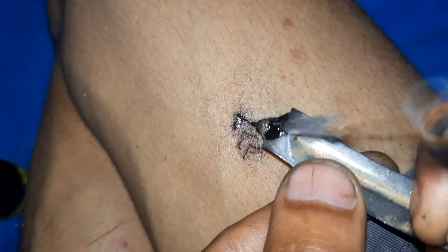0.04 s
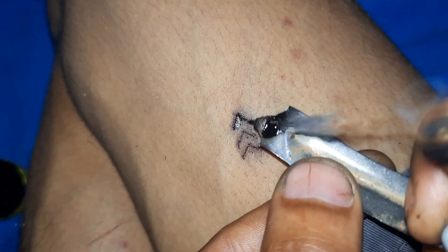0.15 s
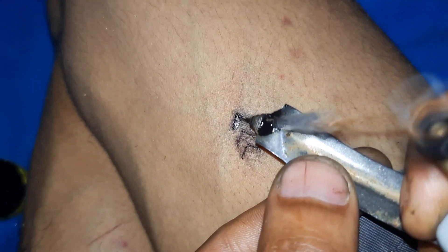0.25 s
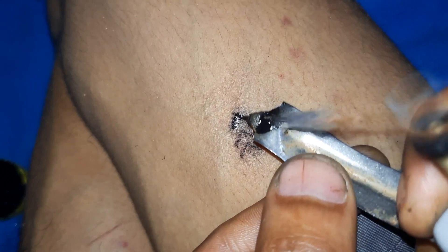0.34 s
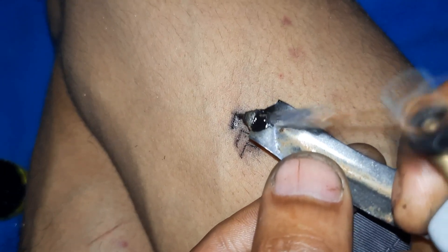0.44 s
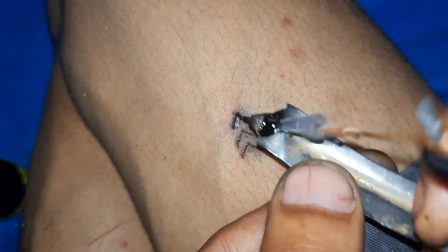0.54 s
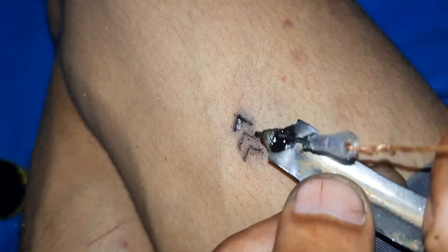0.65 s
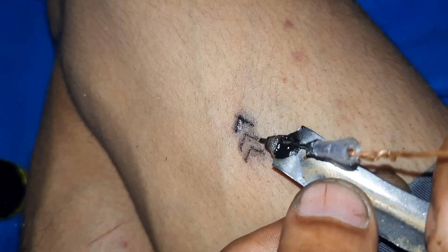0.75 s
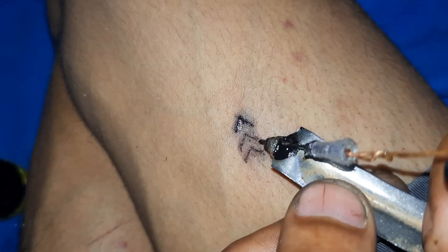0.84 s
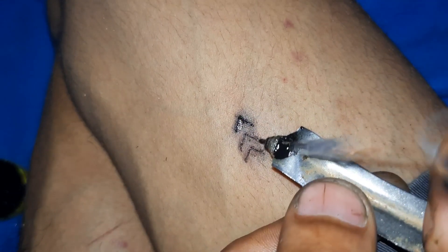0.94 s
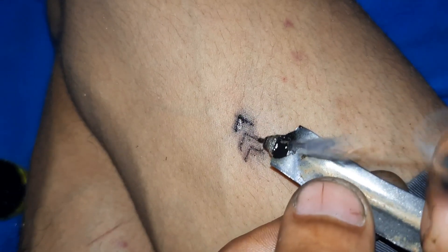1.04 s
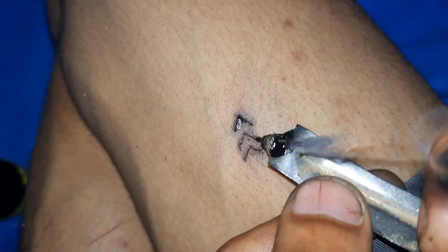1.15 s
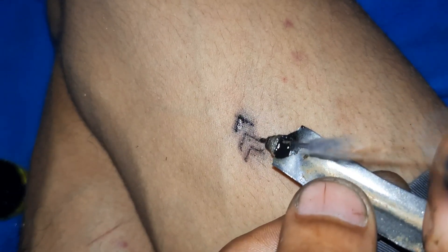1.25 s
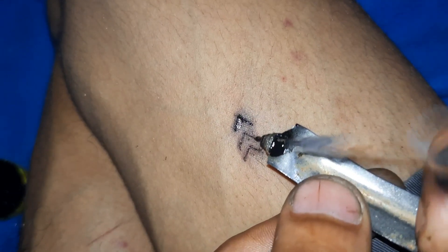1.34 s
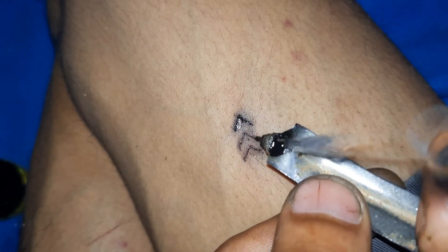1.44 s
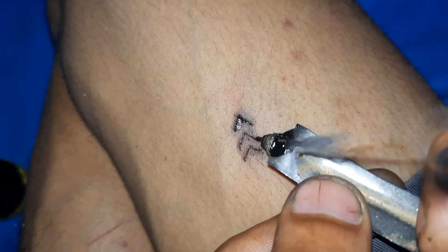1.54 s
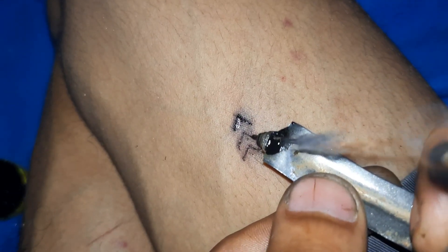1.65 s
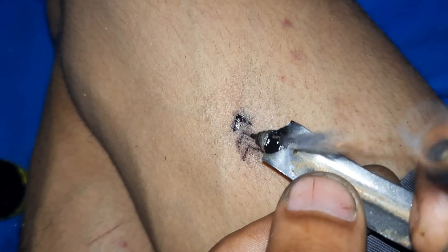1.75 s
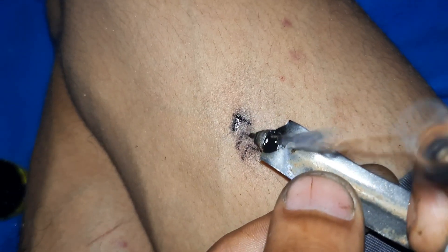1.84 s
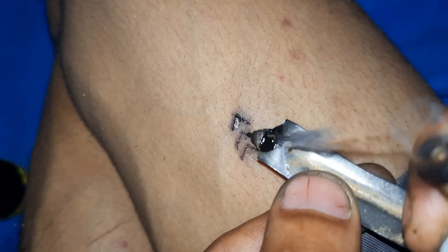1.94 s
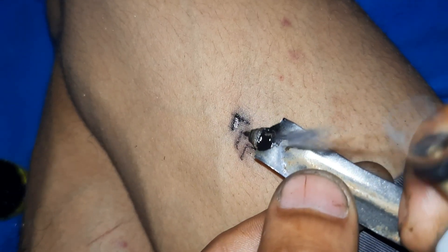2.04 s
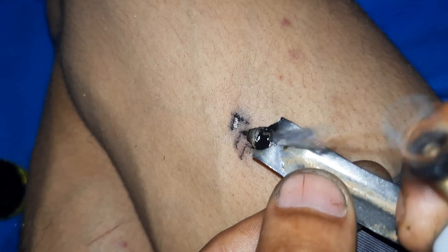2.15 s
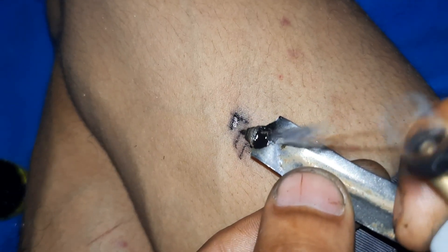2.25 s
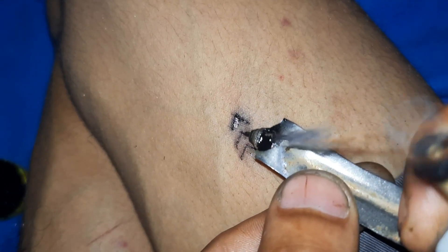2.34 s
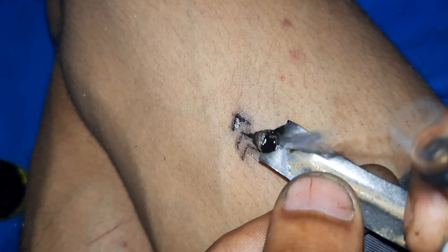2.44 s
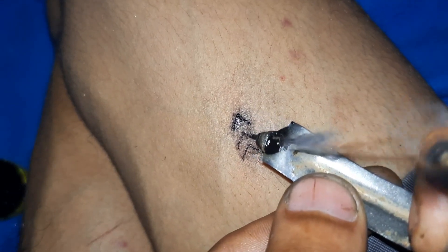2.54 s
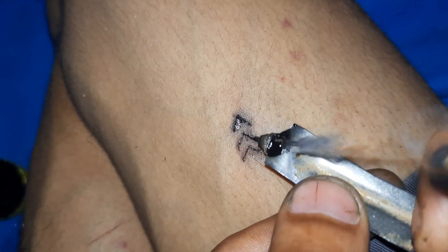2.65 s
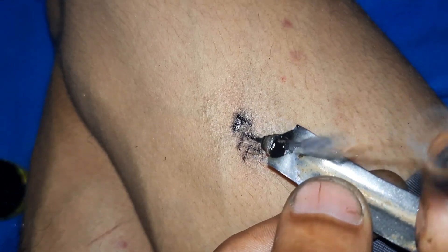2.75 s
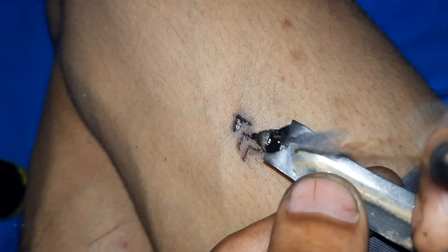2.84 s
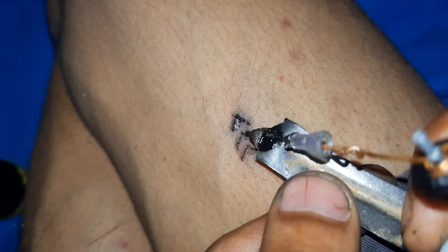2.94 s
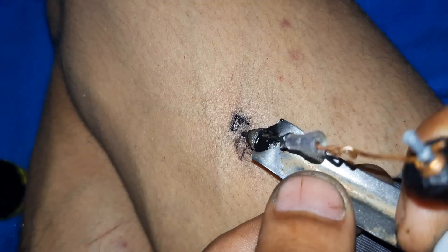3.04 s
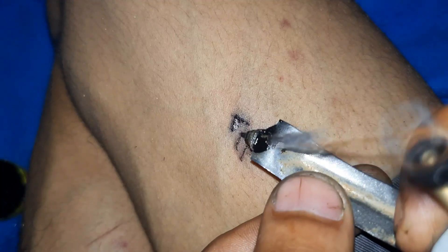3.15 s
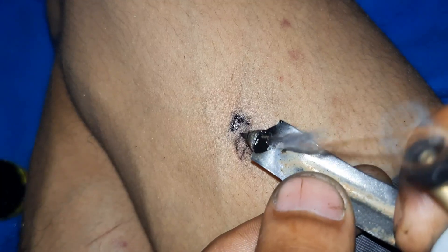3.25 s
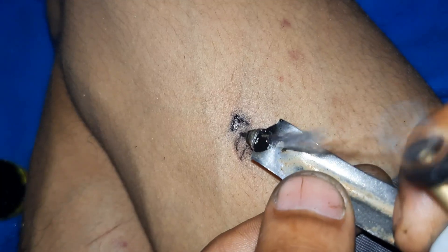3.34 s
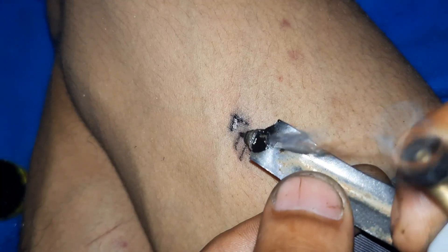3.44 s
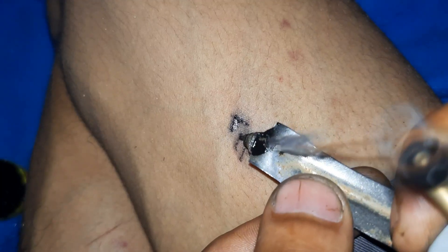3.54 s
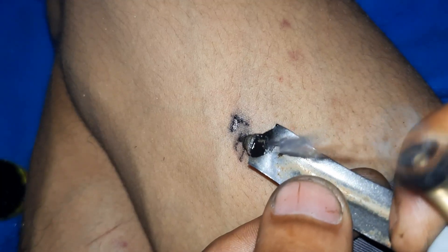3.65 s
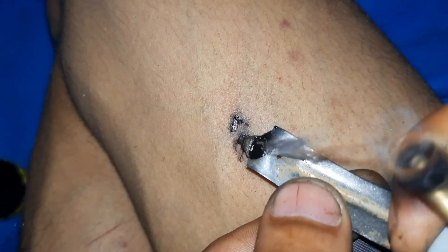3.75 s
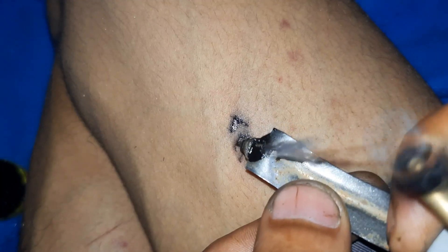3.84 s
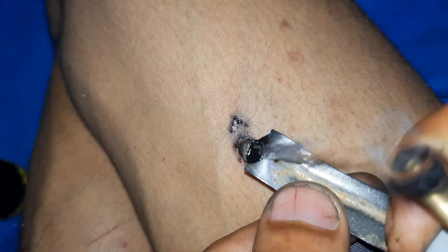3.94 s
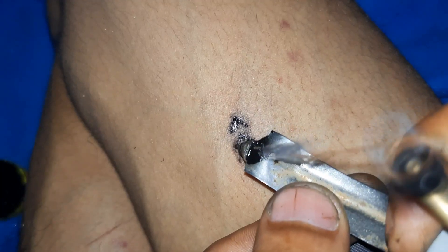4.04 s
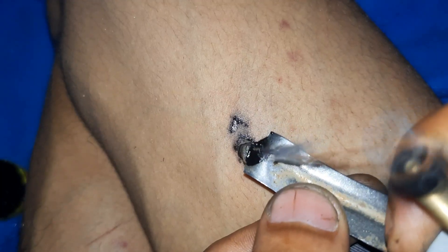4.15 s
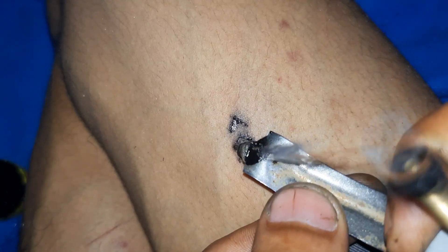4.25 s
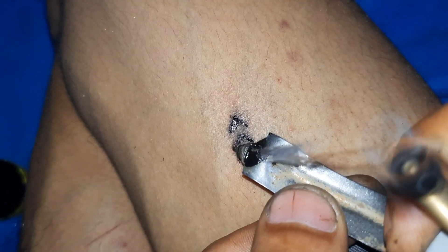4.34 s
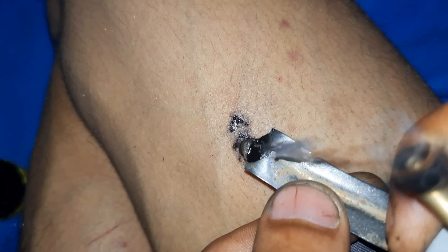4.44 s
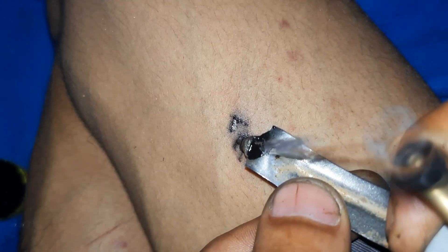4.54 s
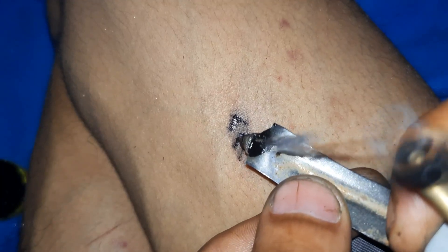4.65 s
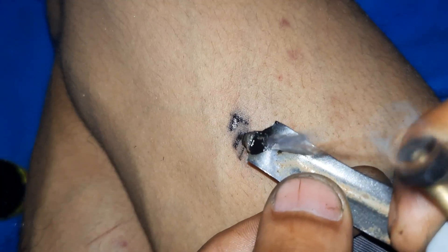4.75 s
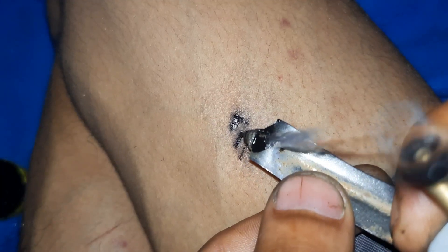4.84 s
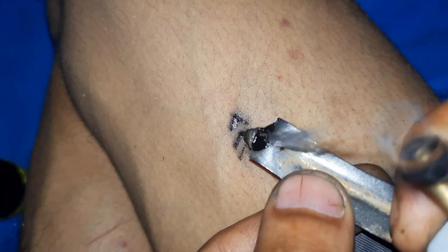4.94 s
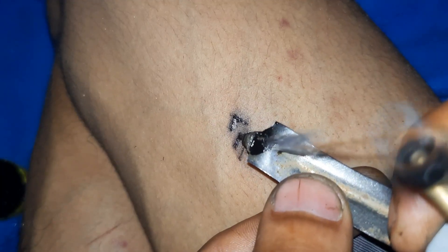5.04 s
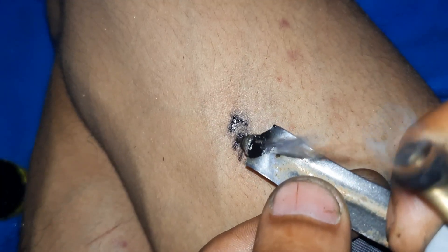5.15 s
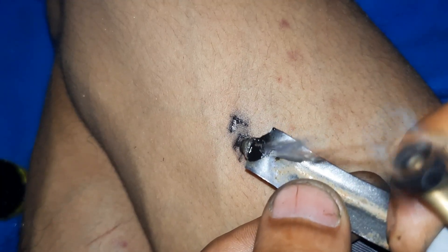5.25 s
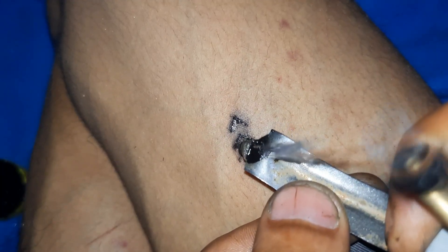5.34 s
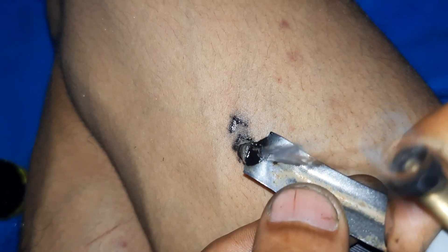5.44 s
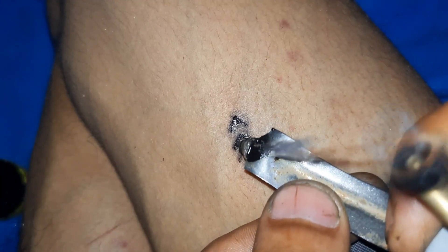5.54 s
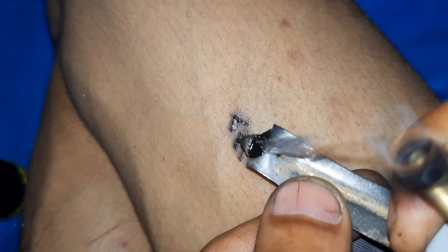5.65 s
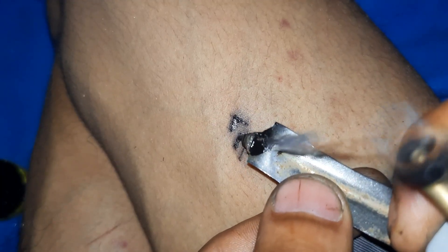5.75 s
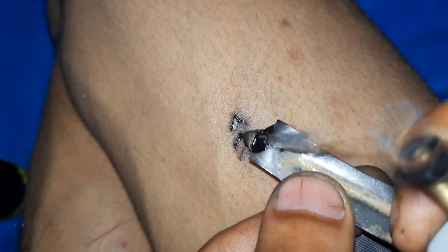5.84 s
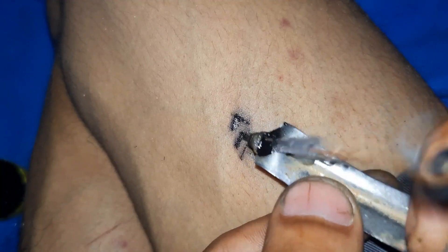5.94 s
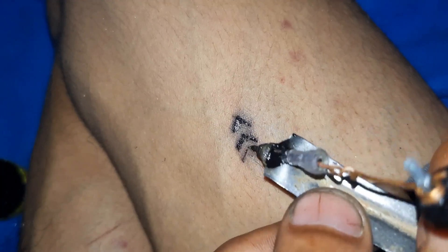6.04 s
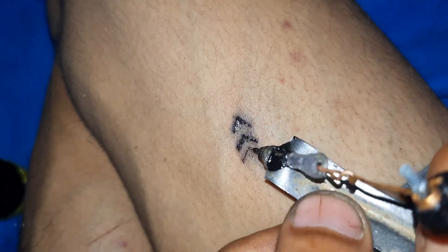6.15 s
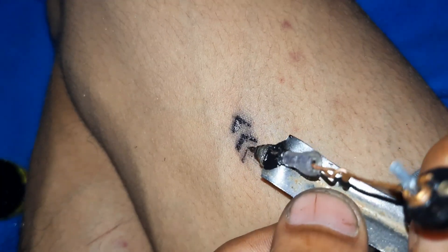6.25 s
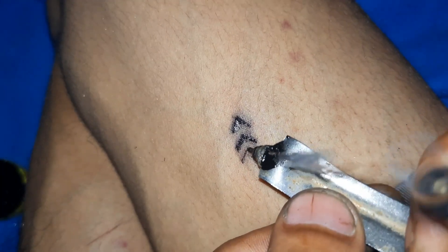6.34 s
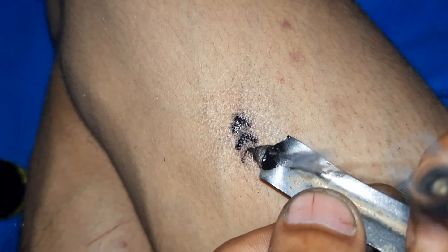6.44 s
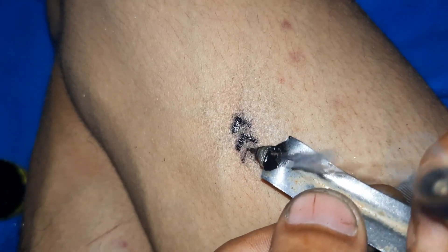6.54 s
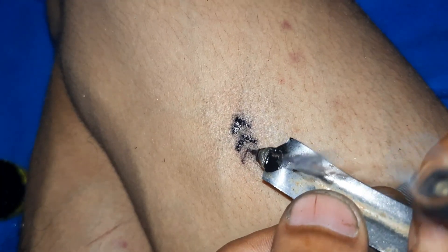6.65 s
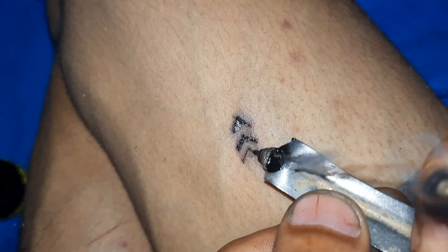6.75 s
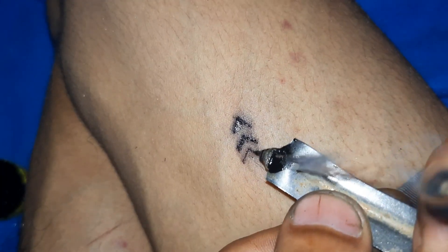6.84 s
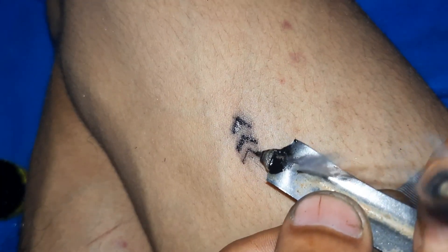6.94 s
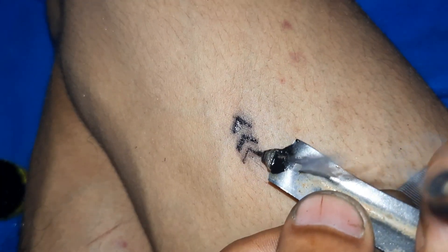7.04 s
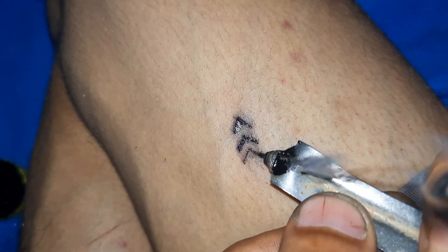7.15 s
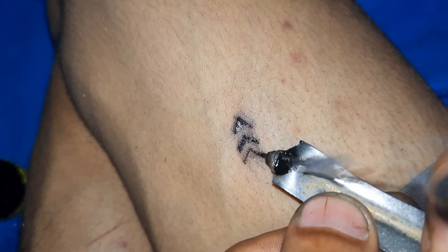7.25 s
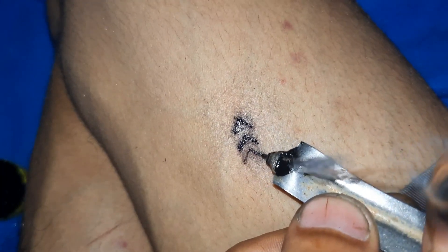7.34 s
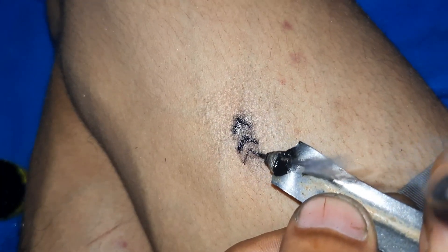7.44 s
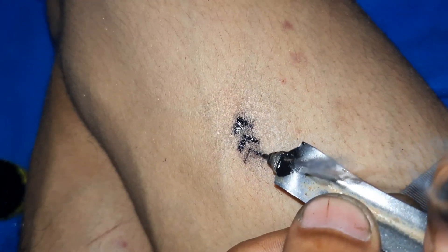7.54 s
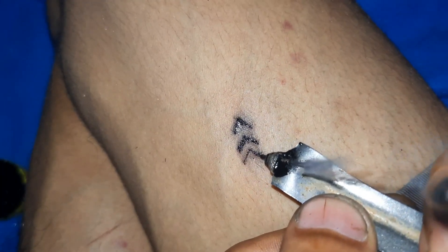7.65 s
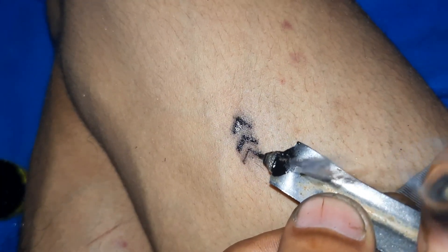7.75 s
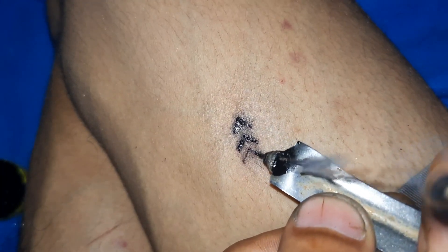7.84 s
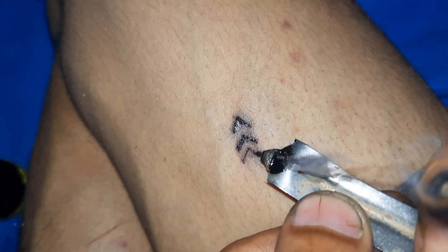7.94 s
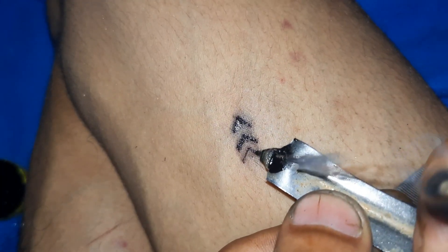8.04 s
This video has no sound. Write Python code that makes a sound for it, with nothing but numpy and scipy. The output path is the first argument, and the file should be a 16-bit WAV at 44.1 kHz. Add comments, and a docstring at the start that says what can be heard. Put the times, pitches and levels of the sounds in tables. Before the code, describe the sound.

Close, rasping buzz of a small tattoo machine working on skin in four runs, split by short pauses.

```python
"""In a small quiet room, a homemade tattoo machine runs four times, close by.
A little motor cranks a needle in a metal guide: every turn it strikes, rebounds and rattles,
making a bright clatter, a wiry rasp and a low buzz, while the skin flutters under it.
High chirps and a few sharp ticks are heard too. Between runs the motor coasts to rest, then spins up.
Faint air and hum lie under it all, and two soft bumps fall in the last pause."""
import sys
import numpy as np
from scipy import signal
from scipy.fft import rfft, irfft
from scipy.io import wavfile
from scipy.ndimage import uniform_filter1d

SR = 44100
rng = np.random.default_rng(int(sys.argv[2]) if len(sys.argv) > 2 else 0)


def wav_out(sig):
    """Save sig, one row per channel (or a flat mono array), as 16-bit PCM at SR to the path in sys.argv[1]."""
    wavfile.write(sys.argv[1], SR, np.round(np.clip(np.atleast_2d(sig).T, -1, 1) * 32767).astype(np.int16))


N = 357651
T = np.arange(N) / SR
SPLIT_HZ = 8000  # the clatter lies above this pitch, the rasp below

# The four runs. Each row: switch-on, switch-off, spin-up time constant and coasting time in seconds,
# speed in Hz, drift in Hz per second, speed lost to drag at the start in Hz.
MOTOR_RUNS = [(-.3, .55, .02, .13, 149, -6, 0), (.96, 2.905, .013, .116, 142.5, .55, 13),
              (3.155, 5.983, .023, .127, 143.4, .55, 8), (6.385, 8.3, .011, .12, 144.5, .42, 2.2)]
# The character of each run. Each row: stroke strength in dB, bounce boost in dB,
# chirp pitch in Hz, tip pitch in Hz, skin rubbing in dB.
RUN_CHARACTER = [(-29, 1.8, 8300, 14200, -68), (-29.5, 1.5, 8330, 14200, -65), (-29.5, 3, 8180, 14400, -65),
                 (-30.5, 2.5, 8320, 14750, -62.5)]
# The strike and the rebound. Each row: place in the turn from 0 to 1, relative level in dB,
# timing scatter in milliseconds, level scatter in dB.
NEEDLE_BLOWS = [(0, 2, 0.012, 1.7), (0.12, -12.5, 0.033, 5.5)]
# The rattle that follows them. Each row: the same four columns.
NEEDLE_BOUNCES = [(.21, 6.5, 0.079, 1.8), (.33, 3.5, .2, 1.8), (0.451, 6, .14, 2.5), (0.608, -4.5, .2, 2),
                  (0.771, -6.5, .3, 2)]
# Thin rings of the metal guide. Each row: pitch in Hz, width in Hz, gain in dB.
GUIDE_RINGS = [(10910, 410, 1.5), (15200, 520, -15)]
# How fast the echo dies. Each row: frequency in Hz, seconds to fall by 60 dB.
ROOM_DECAY = [(300, 0.12), (3000, 0.036), (10000, 0.034), (14300, 0.11)]
# Tone of the clatter on each side. Each row: frequency in Hz, gain in dB.
CLATTER_LEFT = [(8000, -17.5), (8700, -10), (9400, -14), (9750, -15.5), (10300, -9.5), (10800, -19),
                (11100, -19), (11600, -19), (13000, -16.5), (14300, -26.5), (15000, -26), (15700, -11.5)]
CLATTER_RIGHT = [(8000, -11.5), (8700, -10.3), (9400, -9.5), (10000, -9), (10800, -5.5), (11600, -11),
                 (12600, -10), (13200, -9), (14300, -2.5), (15000, -7), (15700, -7.5)]
# Brightness of the clatter. Each row: time in seconds, treble lift in dB.
CLATTER_BRIGHTNESS = [(.1, -2.6), (.45, -1), (1.3, -3), (1.6, -1.5), (2.8, -1.1), (3.35, -2.5), (3.9, 0.6),
                      (4.5, .2), (5.2, -0.9), (5.95, 0), (6.5, 0.4), (8, 1.4)]
# Short, high chirps. Each row: offset from the run's chirp pitch, swerve and width, all in Hz.
CHIRP_NOTES = [(-30.5, 120, 80), (330, 200, 55)]
# How strong the chirps are. Each row: time in seconds, relative level in dB.
CHIRP_CURVE = [(.15, -41.5), (.32, -48), (1.05, -41), (1.3, -39.5), (2, -43), (2.15, -43.5), (2.48, -39.5),
               (2.7, -42.5), (2.89, -37.5), (3.3, -41.5), (5.1, -44), (5.95, -41), (6.47, -37), (6.85, -41),
               (7, -38.5), (7.15, -41), (7.7, -38.5), (8.05, -39.5)]
# Tone of the rasp on each side. Each row: frequency in Hz, gain in dB.
RASP_LEFT = [(100, -56), (900, -51), (1500, -42), (2000, -31), (2600, -23.5), (3600, -16), (4300, -13.5),
             (4900, -19.5), (5700, -15.5), (6200, -11), (6550, -38.5), (7800, -34)]
RASP_RIGHT = [(100, -49.5), (1200, -35), (1950, -22.5), (2150, -21.5), (2350, -17.5), (2700, -19),
              (3050, -11.5), (3450, -24), (3900, -12), (4500, -14), (5200, -18.5), (6000, -13), (6800, -18),
              (7800, -18.5)]
# Rings of the frame. Each row: pitch in Hz, width in Hz, left gain in dB, right gain in dB.
FRAME_RINGS = [(2390, 470, -18, 5), (2996, 38, -15, 13.5), (3830, 100, 17, 2), (6100, 650, 1, 0)]
# Strength of the thuds, one curve a run. Each point: time in seconds, relative level in dB.
THUD_CURVES = [
    [(0.03, -59), (0.18, -57), (0.222, -60), (0.246, -57), (0.3, -59), (0.366, -58), (0.406, -60),
     (0.458, -60.5), (0.53, -58.5)],
    [(1.06, -59), (1.598, -57), (1.614, -57.5), (1.856, -57.5), (1.876, -60.5), (2.234, -57.5),
     (2.244, -59.5), (2.466, -58.5), (2.87, -57)],
    [(3.28, -59.5), (3.33, -58.5), (4.92, -58), (4.93, -55), (5.35, -60.5), (5.47, -57.5), (5.52, -62.5),
     (5.63, -57.5), (5.95, -58)],
    [(6.46, -57.5), (7.068, -60), (7.074, -59.5), (7.854, -60), (7.886, -56), (7.952, -63.5), (7.974, -56),
     (8.028, -63.5), (8.07, -58.5)],
]
# Tone of each stroke's dull thud. Each row: frequency in Hz, gain in dB.
THUD_TONE = [(30, -26), (90, 6.5), (144, 4.5), (290, 3), (430, 1), (580, -2), (720, -4), (870, -2.5),
             (1020, -4), (1150, -2), (1290, -7), (1450, -1), (1750, -6.5), (2000, -18.5), (2320, 7),
             (2700, -20), (4000, -21)]
# Tone of the fluttering skin. Each row: frequency in Hz, gain in dB.
SKIN_TONE = [(60, -16.5), (200, -3.5), (300, -6.5), (500, -2.5), (700, -13.5), (1300, -21), (3000, -52.5)]
# Tone of the room's still air. Each row: frequency in Hz, gain in dB.
AIR_TONE = [(24, -25), (40, -5.5), (54, -28), (139, -9), (183, -9), (235, -15.5), (301, -2), (1130, -24.5),
            (1450, -18.5), (2330, -30.5), (2770, -26.5), (5170, -35), (15500, -31.5)]
# The room's faint hum. Each row: pitch in Hz, average (rms) level in dB.
ROOM_HUM = [(200, -89), (400, -99)]
# Sharp, high ticks. Each row: time in seconds, relative level in dB, lean to the left in dB.
SHARP_TICKS = [(0.068, -40.5, -5), (1.1118, -29.5, -4), (1.295, -23, -2), (1.645, -22.5, 4),
               (1.7986, -24, -5), (1.8827, -29, -5), (2.0798, -21, -4.5), (2.805, -22, -1.5),
               (3.457, -19, 2), (4.9725, -29.5, -5), (6.4113, -35.5, -4), (6.454, -22.5, -1)]
# Soft bumps in the room. Each row: start and length in seconds, pitch in Hz, peak level in dB.
ROOM_BUMPS = [(6.096, 0.12, 282.4, -69.5), (6.312, 0.074, 306, -72)]


def amp(db):
    """Turns decibels into a gain."""
    return 10 ** (np.asarray(db) / 20)


def evened(x):
    """Scales a signal to an average (rms) size of one."""
    return x / np.sqrt(np.mean(x ** 2) + 1e-20)


def value_at(points, hz):
    """Looks up a table by frequency, on a scale of octaves."""
    f, value = np.transpose(points)
    return np.interp(np.log(hz + 1), np.log(f + 1), value)


def wander(hz, step=64):
    """A smooth random curve of average size one, moving at up to about the given rate."""
    coarse = T[::step]
    f = np.fft.rfftfreq(len(coarse), step / SR)
    slow = irfft(rfft(rng.standard_normal(len(coarse))) / (1 + (f / hz) ** 4), len(coarse))
    return np.interp(T, coarse, evened(slow))


def colour(x, points, keep="all", size=4096):
    """Gives a sound the tone in a table, keeping all of it or the part "above" or "below" the split."""
    hz = abs(np.fft.fftfreq(size, 1 / SR))
    above = np.clip((1 + np.tanh((hz - SPLIT_HZ) / 60)) / 2, 1e-7, 1 - 1e-7)
    gain = amp(value_at(points, hz)) * np.sqrt({"all": 1, "above": above, "below": 1 - above}[keep])
    # this filter rings only after a hit, never before it
    taps = np.fft.ifft(np.exp(np.conj(signal.hilbert(np.log(gain))))).real
    return signal.oaconvolve(x, taps[:size // 2])[:N]


def clicks(times, sizes, half_width=8):
    """Clean clicks at exact times, even between samples."""
    place = times[:, None] * SR
    at = np.floor(place).astype(int) + np.arange(1 - half_width, half_width + 1)
    shape = np.sinc(at - place) * np.cos(np.pi * (at - place) / (2 * half_width)) ** 2
    inside = (at >= 0) & (at < N)
    return np.bincount(at[inside], (sizes[:, None] * shape)[inside], N)


def resonate(x, hz, width):
    """Makes a sound ring at a moving pitch; a smaller width rings longer."""
    turn = np.exp(2j * np.pi * np.cumsum(hz) / SR)
    fade = np.exp(-np.pi * width / SR)
    return 2 * (turn * signal.lfilter([1 - fade], [1, -fade], x / turn + 1e-18)).real


def shifting(x, echoes, rate_hz):
    """Drifts between echo patterns, as the hand keeps moving the machine."""
    weights = np.array([wander(rate_hz) for _ in echoes])
    heard = np.array([signal.oaconvolve(x, echo)[:N] for echo in echoes])
    return (weights * heard).sum(0) / np.linalg.norm(weights, axis=0)


def motor(flutter=0.001, loosen_s=.06, sag_hz=.6, force_db=0.58, bite_db=0.8):
    """The motor turns the crank. Pressing harder slows it, hardens the strokes and deepens the bite."""
    pressure = np.tanh(wander(8))
    speed, force, bite, loose_db, chirp_hz, tip_hz, rub = np.zeros((7, N))
    for run, character in zip(MOTOR_RUNS, RUN_CHARACTER):
        on, off, rise, coast, hz, drift, drag = run
        stroke_db, bounce_db, chirp_pitch, tip_pitch, skin_db = character
        age = np.maximum(T - on, 0)
        # the current pulls the rotor up quickly; friction slows it evenly
        up = 1 - np.exp(-age / rise)
        down = np.clip(1 - (T - off) / coast, 0, 1)
        spin = up * down
        # the needle bites only near full speed, so the buzz comes just after the rattle
        depth = up ** 16 * down ** 8
        speed += spin * (hz + drift * age - drag * np.exp(-age / loosen_s) - sag_hz * pressure)
        force += amp(stroke_db) * spin ** 1.66
        bite += depth
        loose_db += bounce_db * spin
        chirp_hz[T >= on], tip_hz[T >= on] = chirp_pitch, tip_pitch
        rub += amp(skin_db) * depth
    turns = np.cumsum(speed * (1 + flutter * wander(35))) / SR
    for on, *_ in MOTOR_RUNS[1:]:
        # at rest the crank settles at the start of a turn
        turns[int(on * SR):] += -turns[int(on * SR)] % 1
    force *= amp(force_db * pressure)
    bite *= amp(bite_db * pressure)
    return turns, force, bite, loose_db, chirp_hz, tip_hz, rub


def contact(turns, force, share, db, scatter_ms, scatter_db, lead_turns=.32):
    """Times and sizes of a hit that comes back every turn; the crank limits how hard it can be."""
    times = np.interp(np.arange(lead_turns + share, turns[-1], 1), turns, T)
    late, harder = rng.standard_normal((len(times), 2)).T
    harder = 2 * np.tanh(harder / 2)
    sizes = np.interp(times, T, force) * amp(db + scatter_db * harder)
    return times + late * scatter_ms / 1000, sizes


def scrape(times, sizes, decay_s):
    """The loudness curve of scraping: each hit makes a tiny burst with the energy of a click."""
    fade = np.exp(-2 / (decay_s * SR))
    energy = np.bincount(np.clip(times * SR, 0, N - 1).astype(int), sizes ** 2, N)
    return np.sqrt(signal.lfilter([1 - fade], [1, -fade], energy + 1e-20))


def guide_rings(x, shift_db=1.4):
    """The metal guide rings at two high pitches; their balance shifts as the needle wanders in it."""
    return sum(amp(db + shift_db * wander(27)) * signal.lfilter(*signal.iirpeak(hz, hz / width, SR), x)
               for hz, width, db in GUIDE_RINGS)


def cracks(times, sizes, decay_s=.00028, grit_db=1.0, size=128):
    """Each blow is a click with a tiny scrape, whose grain changes from turn to turn."""
    fade = np.exp(-np.arange(size) / SR / decay_s)
    grit = rng.standard_normal((len(times), size)) * fade / np.linalg.norm(fade)
    spectra = 1 + amp(grit_db) * rfft(grit)
    spectra /= np.sqrt(uniform_filter1d(abs(spectra) ** 2, size=9))  # evens out the energy
    place = times[:, None] * SR
    at = np.floor(place).astype(int) - 9 + np.arange(size)
    # slide each crack to its exact time
    shapes = irfft(spectra * np.exp(-2j * np.pi * np.fft.rfftfreq(size) * (place - at[:, :1])))
    inside = (at >= 0) & (at < N)
    return np.bincount(at[inside], (sizes[:, None] * shapes)[inside], N)


def reflections(x, decay_s, wet_db, shift_hz=2.59, size=1024):
    """Hand, skin and frame scatter the sound within milliseconds, evenly at all pitches."""
    spectra = rfft(rng.standard_normal((6, size)) * np.exp(-np.arange(size) / SR / decay_s))
    spectra /= np.sqrt(uniform_filter1d(abs(spectra) ** 2, size=15))
    echoes = np.roll(irfft(spectra), size // 64, axis=1)
    return amp(wet_db) * shifting(x, echoes, shift_hz)


def room(x, shift_hz=1.5):
    """The room adds a short, blurred echo, each band dying at its own speed."""
    hz, t, bands = signal.stft(rng.standard_normal((3, 8192)), SR, nperseg=256)
    fade = amp(-60 * t / value_at(ROOM_DECAY, hz)[:, None])
    tails = signal.istft(bands * fade, SR, nperseg=256)[1]
    tails[:, :SR // 300] = 0  # a short gap before the echo
    return shifting(x, tails / np.linalg.norm(tails, axis=1, keepdims=True), shift_hz)


def clatter(blows, bounces, crack_db=5.5, bounce_db=-14.5, ring_db=-6.5, left_db=29, right_db=32.5):
    """Sharp blows and a looser rattle. The needle faces right; the left is later and has more echo."""
    hits, rattle = np.concatenate(blows, axis=1), np.concatenate(bounces, axis=1)
    scraping = amp(bounce_db) * scrape(*rattle, decay_s=0.001)
    taps = clicks(*rattle) + scrape(*rattle, decay_s=0.00019) * rng.standard_normal(N)
    metal = amp(ring_db) * guide_rings(taps)
    # cracks and scraping spread differently towards each side
    left, right = (metal + amp(crack_db) * cracks(*hits) + scraping * rng.standard_normal(N)
                   for _ in range(2))
    left = np.roll(left, 7)  # 7 samples later
    left = left + reflections(left, decay_s=0.0026, wet_db=2) + amp(2) * room(left)
    right = right + reflections(right, decay_s=0.0018, wet_db=-24) + amp(-14.5) * room(right)
    return np.array([amp(left_db) * colour(left, CLATTER_LEFT, "above"),
                     amp(right_db) * colour(right, CLATTER_RIGHT, "above")])


def tip_sizzle(x, tip_hz, width_hz=900, tip_db=-7):
    """The needle's tip lifts a high band of the clatter; its pitch depends on the grip."""
    return x + amp(tip_db) * resonate(x, tip_hz, width_hz)


def tilt(x, bright_db, pivot_hz=10000):
    """Brightens or dulls: what lies above the pivot gains as much as what lies below it loses."""
    high = signal.sosfiltfilt(signal.butter(2, pivot_hz, "high", fs=SR, output="sos"), x)
    return high * amp(bright_db) + (x - high) * amp(-bright_db)


def chirps(strikes, pitch, burst_db=7, gain_db=1, shared=0.75):
    """Short, high chirps near 8-9 kHz that follow the strikes and swerve in pitch."""
    feed = scrape(*strikes, decay_s=0.003)
    out = np.zeros((2, N))
    for offset, swerve, width in CHIRP_NOTES:
        hz = pitch + offset + swerve * wander(30)
        burst = amp(burst_db * np.tanh(wander(24)))
        right, other = (burst * resonate(feed * rng.standard_normal(N), hz, width) for _ in range(2))
        left = shared * right + np.sqrt(1 - shared ** 2) * other
        out += [left, right]
    band = signal.butter(6, [SPLIT_HZ, 9400], "band", fs=SR, output="sos")
    level_db = gain_db + np.interp(T, *np.transpose(CHIRP_CURVE))
    return evened(signal.sosfilt(band, out)) * amp(level_db)


def rasp(blows, bounces, force, rebound_db=8, bounce_db=-15.5, brush_db=-33, left_db=32.5, right_db=34):
    """The frame smears every hit into a wiry rasp, over the even rubbing of the motor's brushes."""
    knocks = clicks(*blows[0]) + amp(rebound_db) * clicks(*blows[1])
    scraping = amp(bounce_db) * scrape(*np.concatenate(bounces, axis=1), decay_s=0.0022)
    rubbing = np.hypot(scraping, amp(brush_db) * force)
    frame = reflections(knocks, decay_s=0.0013, wet_db=-3.5)
    out = []
    # the frame rocks, pushing air towards one side as it pulls it from the other
    for sign, db, tone in ((-1, left_db, RASP_LEFT), (1, right_db, RASP_RIGHT)):
        scattered = reflections(knocks, decay_s=0.004, wet_db=-8.5, shift_hz=4.4)
        side = sign * frame + scattered + rubbing * rng.standard_normal(N)
        out.append(amp(db) * colour(side + amp(-2.5) * room(side), tone, "below"))
    return np.array(out) * amp(0.75 * wander(35))  # the level wavers a little


def frame_rings(strikes, bend=0.0078, swell_db=0.3, grip_hz=4):
    """Every strike rings the metal frame; the fingers nudge each ring's pitch and level."""
    knocks = clicks(*strikes)
    out = np.zeros((2, N))
    for hz, width, left_db, right_db in FRAME_RINGS:
        swell = amp(swell_db * np.tanh(wander(grip_hz)))
        ring = resonate(knocks, hz * (1 + bend * wander(grip_hz)), width)
        out += amp([[left_db], [right_db]]) * swell * ring
    return out


def thud(blows, turns, bite, thud_db=41, swing_db=-50, rub_db=-31, left_db=-34, uneven_db=4):
    """The strike pulls and the rebound pushes: a low buzz over the crank's swing, mostly on the right."""
    strength = bite * amp(np.interp(T, *np.concatenate(THUD_CURVES).T))
    strokes = []
    for times, _ in blows:
        uneven = amp(uneven_db * np.tanh(rng.standard_normal(len(times))))
        strokes.append(clicks(times, np.interp(times, T, strength) * uneven))
    pull, push = strokes
    rub = amp(rub_db) * strength * rng.standard_normal(N)
    swing = amp(swing_db + .5 * wander(11)) * bite * np.sin(2 * np.pi * (turns - .42))
    return (amp(thud_db) * colour(push - pull + rub, THUD_TONE) + swing) * amp([[left_db], [0]])


def skin(flutter_db=6, flutter_hz=22, gain_db=4, left_db=-22):
    """The skin flutters under the needle, making a low, rough, lumpy noise."""
    noise = colour(rng.standard_normal(N), SKIN_TONE)
    flutter = amp(flutter_db * np.tanh(wander(flutter_hz)))
    return amp(gain_db) * evened(noise * flutter) * amp([[left_db], [0]])


def air(level_db=-78.5):
    """Faint, gently wavering room noise with a low hum."""
    left, right, shared = rng.standard_normal((3, N))
    noise = np.array([colour(side + shared, AIR_TONE) for side in (left, right)])
    hum = sum(amp(db) * np.sqrt(2) * np.sin(2 * np.pi * hz * T) for hz, db in ROOM_HUM)
    return amp(level_db + 1.2 * wander(6.6)) * evened(noise) + hum


def ticks(band_hz=(6300, 8600), gain_db=2, early_db=-7, early_s=1 / 143):
    """Occasional sharp, high ticks, each with a fainter tick just before it."""
    out = np.zeros((2, N))
    band = signal.butter(4, band_hz, "band", fs=SR, output="sos")
    tick = signal.sosfilt(band, signal.unit_impulse(SR // 100))
    tick /= abs(tick).max()
    for start, db, lean_db in SHARP_TICKS:
        sides = amp([[lean_db / 2], [-lean_db / 2]])
        at = int(start * SR)
        out[:, at:at + len(tick)] += sides / sides.mean() * amp(db + gain_db) * tick
    return out + amp(early_db) * np.roll(out, -int(early_s * SR), axis=1)


def bumps(smear_hz=30):
    """Each bump swells quickly and dies away around one low, unsteady note."""
    out = np.zeros(N)
    for start, length, hz, db in ROOM_BUMPS:
        progress = np.clip((T - start) / length, 0, 1)
        cycles = np.cumsum(hz + smear_hz * wander(45)) / SR
        out += amp(db) * np.sin(np.pi * progress ** 0.65) ** 2 * np.sin(2 * np.pi * cycles)
    return out


def scene(rasp_db=-1.31, rasp_follow=0.82):
    """One crank drives the clatter, rasp and thud; a brighter stretch also rasps a little more."""
    turns, force, bite, loose_db, chirp_hz, tip_hz, rub = motor()
    bright_db = np.interp(T, *np.transpose(CLATTER_BRIGHTNESS))
    blows = [contact(turns, force, *row) for row in NEEDLE_BLOWS]
    bounces = [contact(turns, force * amp(loose_db), *row) for row in NEEDLE_BOUNCES]
    strikes = blows[0]
    highs = tilt(tip_sizzle(clatter(blows, bounces), tip_hz), bright_db)
    highs += bite * chirps(strikes, chirp_hz)
    mids = rasp(blows, bounces, force) + frame_rings(strikes)
    mids *= amp(rasp_db + rasp_follow * bright_db)
    lows = thud(blows, turns, bite) + rub * skin()
    return highs + mids + lows + ticks() + bumps() + air()


def record(dry, edge_hz=15770):
    """Cuts away the very highest treble."""
    lowpass = signal.firwin(511, edge_hz, window=("kaiser", 9), fs=SR)
    return signal.oaconvolve(dry, lowpass[None], "same")


dry = scene()
out = record(dry)
wav_out(out)
```